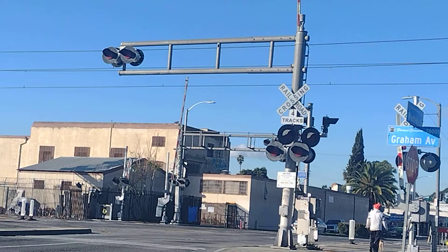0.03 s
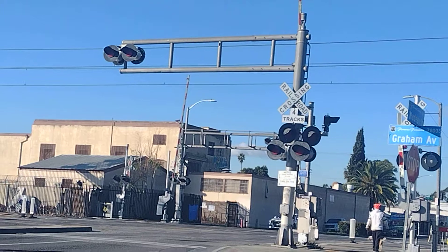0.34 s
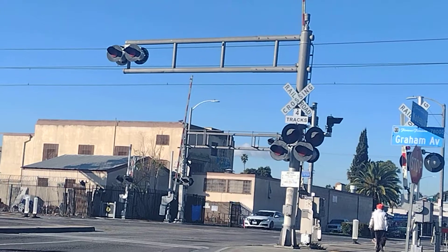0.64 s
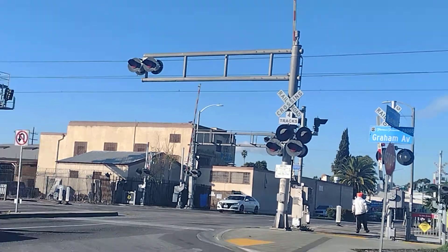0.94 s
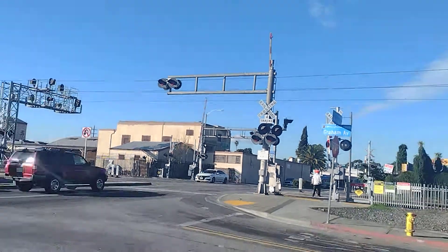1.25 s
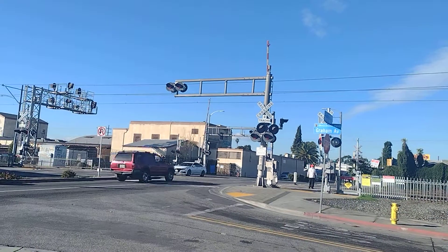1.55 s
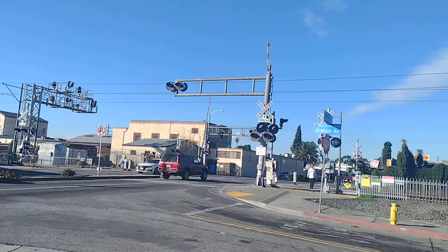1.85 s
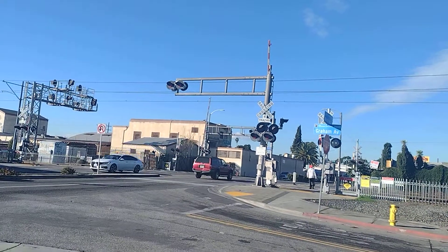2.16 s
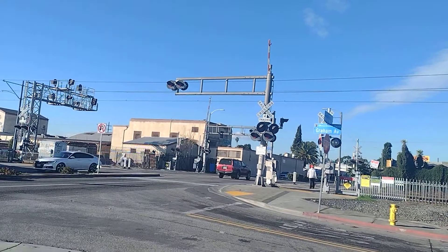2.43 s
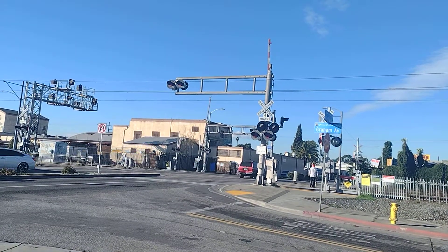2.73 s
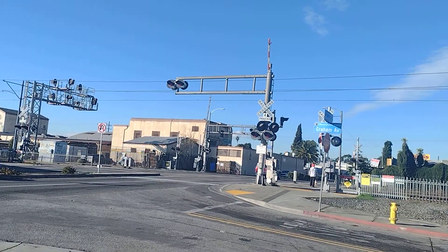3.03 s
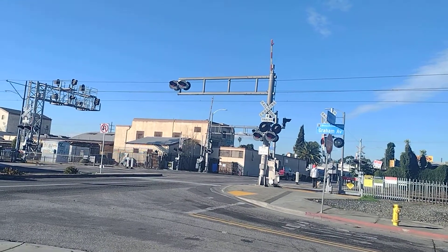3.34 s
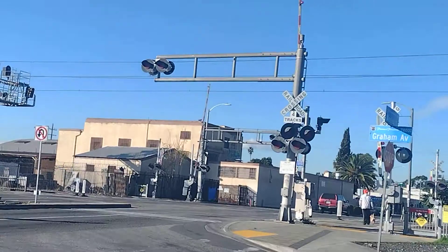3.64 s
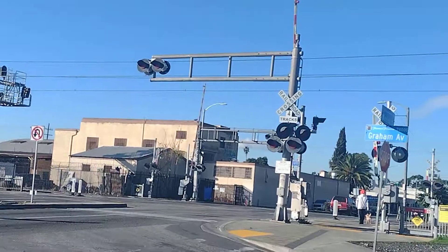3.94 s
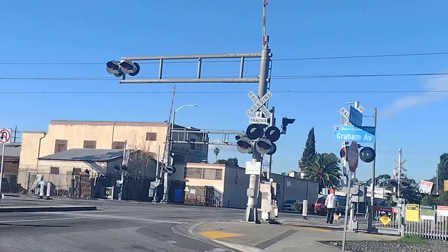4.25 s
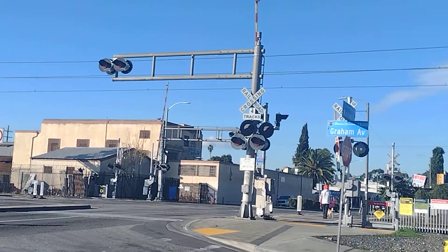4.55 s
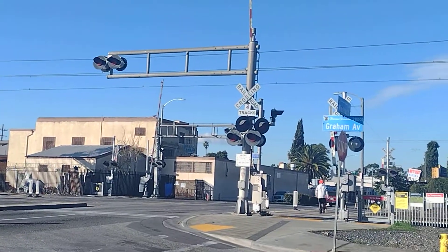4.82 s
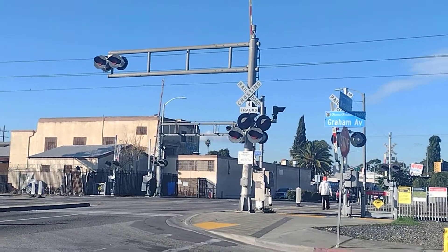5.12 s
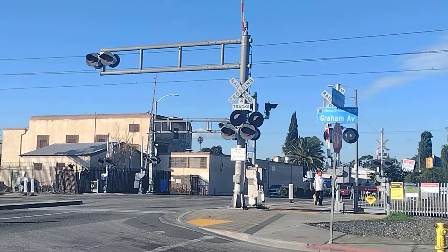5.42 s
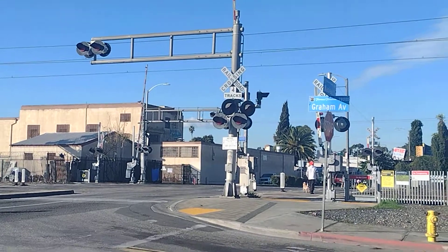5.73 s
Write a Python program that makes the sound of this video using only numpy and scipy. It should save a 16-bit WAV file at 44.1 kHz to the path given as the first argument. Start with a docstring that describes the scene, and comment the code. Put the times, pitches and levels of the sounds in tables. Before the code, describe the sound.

After a brief silence, outdoor street sound fades in at about 0.4 seconds, heard from the kerb by a level crossing. An SUV rolls from the left towards the centre with a low rumble, tyre roar and light hiss. A saloon car follows, loudest around 2.3 seconds. From 1.3 to about 2.9 seconds their wheels clack and thump over the rails in a quick, uneven run, with two faint, sharp ticks just after 2 seconds and one last soft thump at 3.4. The saloon's low exhaust hum swells near 3 seconds and dies away, leaving a steady murmur of distant traffic. Loose metal clinks briefly around 4 seconds and more faintly at 4.8. A finger lightly brushes the microphone on the left at 5 seconds, and a small tick follows at 5.5. A quieter third car nears from the left with a hollow tyre drone until 6 seconds.

```python
"""Cars on a level crossing

Heard from the kerb, an SUV and then a saloon roll by with a rumble, a tyre roar and a hiss. Their
wheels clack on the rails, the air in the tyres thumps, and the saloon's exhaust hums. A third car nears.
Town traffic murmurs, loose metal clinks, sharp ticks sound close by, and a finger brushes the camera."""
import sys
import numpy as np
from scipy import signal
from scipy.fft import rfft, irfft
from scipy.io import wavfile
from scipy.ndimage import uniform_filter1d

SR = 44100
rng = np.random.default_rng(int(sys.argv[2]) if len(sys.argv) > 2 else 0)


def int16_out(signal):
    """Quantize to a 16-bit WAV file."""
    q = np.round(np.clip(np.atleast_2d(signal).T, -1, 1) * 32767)
    wavfile.write(sys.argv[1], SR, q.astype(np.int16))


N = 263718
TIME = np.arange(N) / SR

# where each car is: t/s, direction (sine of the angle: -1 is left, +1 is right)
SALOON_PATH = [(1.7, -0.51), (2.3, -0.066), (2.801, -0.39), (3.399, -0.39), (4.3, -0.38)]
THIRD_PATH = [(5, -0.91), (6, -0.98)]
# the saloon's tone colour, one list each for rumble, roar and hiss: f/Hz, level/dB
SALOON_COLOURS = [
    [(35, -43), (62, -29), (100, 4), (165, -3.5), (226, 3.5), (320, -1), (470, -16.5), (900, -68)],
    [(450, -29), (660, -2), (1000, 4), (1300, -5), (1600, -3.5), (2300, -12), (2900, -19.5), (3500, -34.5),
     (5500, -65)],
    [(2000, -39), (3400, 1.5), (4100, 4), (5800, -4), (7000, -6.5), (8800, -10), (10700, -23), (15500, -31)],
]
# an axle meets a rail: t/s, clack level/dB, thump level/dB, thump f/Hz, head start of one wheel/s
AXLE_HITS = [(1.2545, -17, -20, 92, 0), (1.336, -14, -18, 328, .0115), (1.514, -9.5, -17, 208, .012),
             (1.595, -10, -14.5, 229, .0115), (1.638, -13, -23.5, 216, 0.013),
             (1.6749, -14.5, -19.5, 217, 0), (1.756, -9, -33, 218, 0.0012), (1.794, -16.5, -35, 222, .007),
             (1.941, -25, -13.5, 221, 0), (2.0163, -15.5, -15.5, 212, 0),
             (2.1274, -13, -16.5, 243, 0.00061), (2.175, -11.5, -13.5, 188, 0),
             (2.2443, -21.5, -13.5, 220, 0), (2.2845, -13.5, -12, 221, .008),
             (2.32, -28, -16.5, 229, 0.0087), (2.4, -15, -19, 239, 0.0035), (2.722, -23, -26, 238, .009),
             (2.92, -33.5, -18.5, 233, 0.0065), (3.3931, -35, -24.5, 315, 0)]


def gain_of(db):
    """Turns decibels into a number to multiply a sound by."""
    return 10 ** (np.asarray(db) / 20)


def evened(x):
    """Scales a signal to an average strength (rms) of 1."""
    return x / np.sqrt(np.mean(x ** 2) + 1e-20)


def at_pitch(table, hz):
    """Looks up a table by frequency, giving each octave equal room."""
    f, value = np.transpose(table)
    return np.interp(np.log(hz + 1), np.log(f + 1), value)


def at_time(table, t):
    """Looks up a table by time, drawing straight lines between its rows."""
    return np.interp(t, *np.transpose(table))


def add(mix, start_s, sound):
    """Adds a sound to both channels of the mix."""
    part = mix[:, round(start_s * SR):][:, :sound.shape[-1]]
    part += sound[..., :part.shape[1]]


def coloured(x, colour):
    """Turns each frequency up or down by a table of f/Hz, level/dB."""
    size = x.shape[-1]
    return irfft(rfft(x) * gain_of(at_pitch(colour, np.fft.rfftfreq(size, 1 / SR))), size)


def wobble(top_hz, order):
    """A random wavering, mostly slower than top_hz."""
    return evened(signal.sosfilt(signal.butter(order, top_hz, fs=SR, output="sos"), rng.normal(size=N)))


def swell(from_s, until_s, level_db, rise_db_per_s, fade_db_per_s):
    """A volume curve that rises, holds between the two times, then fades."""
    early, late = np.maximum(from_s - TIME, 0), np.maximum(TIME - until_s, 0)
    return gain_of(level_db - rise_db_per_s * early - fade_db_per_s * late)


def road_noise(colour, path, directness, flicker_db, mic_gap_s=0.00053):
    """Flickering noise at two microphones: part comes straight from the source, part from all round."""
    # how much sound comes straight, before directness scales it: f/Hz, weight
    straight_weights = [(100, 0.42), (500, 0.66), (1000, 0.71), (2000, 0.33), (3000, 0.13), (6000, 0.2),
                        (12000, 0.3)]
    t, hz = np.arange(N // 256 + 5) * 256 / SR, np.fft.rfftfreq(1024, 1 / SR)
    shape = (3, len(t), len(hz))
    direct, common, apart = rng.standard_normal(shape) + 1j * rng.standard_normal(shape)
    # straight sound reaches the nearer microphone first
    shift = np.exp(1j * np.pi * hz * mic_gap_s * at_time(path, t)[:, None])
    straight = np.array([direct / shift, direct * shift])
    # scattered sound is alike on both sides only in the bass
    alike = .98 * np.sinc(2 * hz * mic_gap_s)
    common, apart = common * np.sqrt((1 + alike) / 2), apart * np.sqrt((1 - alike) / 2)
    scattered = np.array([common + apart, common - apart])
    share = np.clip(directness * at_pitch(straight_weights, hz), 0, 1)
    spectrum = np.sqrt(share) * straight + np.sqrt(1 - share) * scattered
    flicker = uniform_filter1d(rng.standard_normal(shift.shape), size=10, axis=0)  # smooth in time
    flicker = evened(uniform_filter1d(flicker, size=9, axis=1))  # and in pitch
    rolloff_db = -60 * np.log2(np.maximum(hz / colour[-1][0], 1))  # above the table's last row
    spectrum *= gain_of(at_pitch(colour, hz) + rolloff_db + flicker_db * flicker)
    noise = signal.istft(spectrum.transpose(0, 2, 1), nperseg=1024, noverlap=768)[1][:, :N]
    return noise / noise.mean(0).std()


def bursts(hits, colour, t60_s, spread, snap=5):
    """Sharp bursts (t/s, level/dB) whose noise falls 60 dB in t60_s; spread sets the stereo width."""
    out, t = np.zeros((2, N)), np.arange(-256, 7936) / SR
    for start_s, db in hits:
        burst = rng.standard_normal((2, len(t))) * (t >= 0) * gain_of(-60 * abs(t) / t60_s)
        burst[0, np.searchsorted(t, .001)] += snap  # a click just after the start
        mid, side = coloured(burst, colour)
        stereo = np.array([mid + spread * side, mid - spread * side])
        add(out, start_s + t[0], gain_of(db) * stereo / abs(mid).max())
    return out


def microphone_hiss(level_db=-84):
    """The faint, even hiss that microphones make by themselves."""
    return gain_of(level_db) * rng.standard_normal((2, N))


def town(engines_db=-39, wash_db=-43.5):
    """Far traffic: a steady low murmur of engines and a soft wash of noise."""
    # tone colour, one list for the engines and one for the wash: f/Hz, level/dB
    colours = [
        [(30, -29.5), (55, -21.5), (85, 0.5), (175, -2.5), (250, -2.5), (330, -5.5), (550, -14.5), (900, -66.5)],
        [(400, -11), (620, -0.5), (850, 4), (1200, -3), (2150, -12), (3250, -29.5), (4800, -43), (6300, -43),
         (8500, -58), (15500, -65.5)],
    ]
    engines = road_noise(colours[0], THIRD_PATH, directness=0.34, flicker_db=1.0)
    wash = road_noise(colours[1], THIRD_PATH, directness=0.89, flicker_db=1.75)
    return engines * gain_of(engines_db) + wash * gain_of(wash_db)


def street_echoes(sound, level_db=-10):
    """Walls and posts throw back scattered echoes; the treble dies first."""
    # how long echoes last: f/Hz, time to fall by 60 decibels/s
    decay_times = [(100, 0.17), (1000, 0.14), (4000, 0.16), (12000, 0.077)]
    echoes = rng.standard_normal((2, SR // 2)) * (rng.random((2, SR // 2)) < .05)
    echoes[:, :200] = 0  # the gap before the first echo
    hz, t, spectrum = signal.stft(echoes, SR, nperseg=256)
    decay = gain_of(-60 * t / at_pitch(decay_times, hz)[:, None])
    tail = signal.istft(spectrum * decay, SR, nperseg=256)[1]
    return gain_of(level_db) * signal.fftconvolve(sound, tail / np.linalg.norm(tail[0]), axes=1)[:, :N]


def finger_brush(right_db=-13):
    """Skin slides over the camera beside the left microphone."""
    # tone colour of sliding skin: f/Hz, level/dB
    colour = [(1500, -20), (3000, 11), (3800, -14), (4600, 1), (5400, -17), (6300, 4), (7000, 1),
              (8200, -12), (10500, -23), (15000, -27)]
    brush = evened(coloured(rng.standard_normal((2, N)), colour))
    brush *= swell(5.005, 5.052, level_db=-55.5, rise_db_per_s=410, fade_db_per_s=330)
    return brush * gain_of([[0], [right_db]])


def ticks():
    """Sharp, high ticks close by, two of them as the wheels clack on the rails."""
    # a tick's tone colour: f/Hz, level/dB
    colour = [(1000, -20.5), (3000, -10.5), (6500, 5), (9000, -3), (11000, -16), (15000, -17)]
    # each tick: t/s, level/dB
    moments = [(2.023, -46), (2.1744, -51), (5.4655, -53)]
    return bursts(moments, colour, t60_s=.018, spread=.3)


def rattles():
    """Loose metal clinks down the road, ringing in a few broad bands of pitch."""
    # where the metal rings: f/Hz, width/Hz, level/dB
    bands = [(2110, 200, 29.5), (3140, 760, 3), (4730, 480, 3), (6400, 740, -13)]
    # each clink: t/s, level/dB
    clinks = [(3.8955, -42), (4.0557, -35.5), (4.0774, -47), (4.8135, -53)]
    hz = np.geomspace(500, 15000, 120)
    ringing = sum(gain_of(db) / (1 + (2 * (hz - f) / width) ** 2) for f, width, db in bands)
    colour = np.column_stack([hz, 20 * np.log10(ringing)])
    return bursts(clinks, colour, t60_s=.15, spread=0.33)


def tyre_drone():
    """Tyres still far up the road throw a hollow note ahead of them."""
    # the note's tone colour: f/Hz, level/dB
    colour = [(280, -24.5), (400, -4), (510, 7.5), (620, -11.5), (850, -28.5)]
    # each drone: full from t/s, until t/s, level/dB, rise/(dB/s), fade/(dB/s)
    swells = [(0.414, 0.517, -37, 20, 25.5), (5.883, 5.98, -36, 44, 28)]
    volume = sum(swell(*row) for row in swells)
    return road_noise(colour, THIRD_PATH, directness=1.33, flicker_db=0.8) * volume


def rolling_car(swells, path, colours, directness, grit_db):
    """Body rumble, tyre roar and tread hiss grow as a car nears and fade as it leaves."""
    rumble, roar, hiss = (road_noise(colour, path, directness, flicker_db=1.4) * swell(*row)
                          for row, colour in zip(swells, colours))
    grit = gain_of(grit_db * wobble(top_hz=110, order=3))  # coarse asphalt shakes the tread
    return rumble + (roar + hiss) * grit


def third_car():
    """A quieter car rolls closer on the left at the end."""
    # rumble, roar and hiss: full from t/s, until t/s, level/dB, rise/(dB/s), fade/(dB/s)
    swells = [(5.6, 5.7, -50, 33, 35), (5.78, 5.98, -40.5, 28, 15), (5.9, 5.98, -69.5, 30, 10)]
    # their tone colours: f/Hz, level/dB
    colours = [
        [(30, -38), (80, -2), (170, -7), (450, 13), (900, -53)],
        [(450, -13), (700, 3), (1100, -16), (1350, -7), (1750, -7.5), (2300, -19.5), (3500, -32.5), (5500, -78)],
        [(2000, -28), (3500, 6), (5200, -1), (6200, 3), (7700, -3), (9500, -32), (15500, -52)],
    ]
    return rolling_car(swells, THIRD_PATH, colours, directness=1.43, grit_db=-1.5)


def suv():
    """The first car rolls by from left to right."""
    # rumble, roar and hiss: full from t/s, until t/s, level/dB, rise/(dB/s), fade/(dB/s)
    swells = [(.58, 1.93, -28.5, 50, 33), (1.36, 1.87, -28.5, 3.5, 33.5), (0.38, 1.05, -58, 8, 10.5)]
    # their tone colours: f/Hz, level/dB
    colours = [
        [(30, -41.5), (75, -14.5), (135, 2), (175, -7.5), (225, -2), (340, -2.5), (470, -8), (570, -24.5),
         (900, -75)],
        [(450, -23), (650, 4), (950, 8), (1400, -4), (2150, -3.5), (2700, -13), (3400, -23.5), (5500, -59)],
        [(2000, -32.5), (3400, 0.5), (4100, 3), (6300, -3), (9000, -15.5), (10700, -24), (13200, -22),
         (15500, -23)],
    ]
    # where the car is: t/s, direction (-1 is left, +1 is right)
    path = [(.4, -0.94), (.9, -0.55), (1.4, -0.41), (1.55, 0.17), (2.6, 0.067), (3.6, 0.34)]
    return rolling_car(swells, path, colours, directness=0.85, grit_db=1.24)


def saloon():
    """The second car rolls by just after the first."""
    # rumble, roar and hiss: full from t/s, until t/s, level/dB, rise/(dB/s), fade/(dB/s)
    swells = [(2.22, 2.357, -24, 20.5, 87), (2.254, 2.357, -27.5, 22.4, 15.3), (2.2, 2.46, -66, 39, 6.1)]
    return rolling_car(swells, SALOON_PATH, SALOON_COLOURS, directness=0.92, grit_db=1.9)


def exhaust(waver=0.0363, rough_db=3, overtone_db=-7):
    """The saloon turns its tail to the kerb: uneven engine pulses hum over a boom of gas."""
    # how often the engine fires, slowing as the driver eases off: t/s, f/Hz
    firing = [(2.2, 117.1), (2.7, 109.9), (4.4, 109.7)]
    firing_hz = at_time(firing, TIME) * (1 + waver * wobble(top_hz=18, order=2))
    cycles = np.cumsum(firing_hz) / SR
    hum = evened(sum(gain_of(overtone_db * k) * np.sin(2 * np.pi * (k + 1) * cycles) for k in range(3)))
    hum *= gain_of(rough_db * wobble(top_hz=18, order=2))
    hum *= swell(3, 3, level_db=-34, rise_db_per_s=11, fade_db_per_s=29)
    boom = road_noise(SALOON_COLOURS[0], SALOON_PATH, directness=0.88, flicker_db=0.6)
    boom *= swell(2.5, 3, level_db=-31.5, rise_db_per_s=45, fade_db_per_s=13)
    return hum + boom


def tyre_thumps(t60_s=0.082, rise_s=0.0031, lag_s=.006, panel_hz=315, panel_db=-8):
    """Hitting a rail briefly rings the air inside the tyre and the crossing panel under it."""
    out, t = np.zeros((2, N)), np.arange(SR // 4) / SR
    volume = (1 - np.exp(-t / rise_s)) * gain_of(-60 * t / t60_s)
    for hit_s, _, db, tyre_hz, _ in AXLE_HITS:
        tyre, panel = np.sin(2 * np.pi * (np.outer([tyre_hz, panel_hz], t) + rng.random((2, 1))))
        ring = (tyre + gain_of(panel_db) * panel) * volume
        add(out, hit_s + lag_s, gain_of(db) * ring / abs(ring).max())
    return out


def wheel_clacks(early_wheel_db=-4, joint_count=10):
    """Wheels strike the rails, and joints between the crossing panels add light knocks at random."""
    # a clack's tone colour: f/Hz, level/dB
    colour = [(60, -46), (200, 4.5), (550, -1.5), (900, 5), (1300, 2.5), (1900, 7), (2700, -2), (3300, -14),
              (4500, -28), (7000, -46.5), (11000, -59.5)]
    main = [(hit_s, db) for hit_s, db, *_ in AXLE_HITS]
    # an axle that crosses at a slant lands one wheel early, and more lightly
    early = [(hit_s - lead_s, db + early_wheel_db) for hit_s, db, _, _, lead_s in AXLE_HITS if lead_s > 0]
    joint_s = rng.uniform(1.2, 2.8, joint_count)
    joint_db = rng.normal(-29.5, 2.2, joint_count)
    return bursts([*main, *early, *zip(joint_s, joint_db)], colour, t60_s=0.031, spread=.25, snap=8.5)


def scene():
    """Three cars, their blows on the rails and the town behind; only clacks and rattles echo."""
    cars = suv() + saloon() + third_car()
    knocks = wheel_clacks() + rattles()
    street = cars + exhaust() + tyre_drone() + town() + knocks + street_echoes(knocks) + tyre_thumps()
    return street + finger_brush() + ticks() + microphone_hiss()


def record(dry, start_s=.366, fade_in_s=0.22, opening_db=-9, bass_cut_hz=54, treble_cut_hz=15730):
    """After a silence the sound fades in; each microphone colours it and loses deep bass and top treble."""
    # how the two microphone openings differ: f/Hz, left minus right level/dB
    mic_balance = [(100, 0.1), (700, -0.65), (1400, 0.8), (2400, 3.5), (2900, 2), (3400, -5), (4300, 1.5),
                   (6200, 2), (7400, -7), (9500, -1.5), (13000, -2.5)]
    fade_in = np.interp(TIME - start_s, [0, .004, fade_in_s], [0, gain_of(opening_db), 1])
    left, right = np.pad(dry * fade_in, ((0, 0), (0, SR // 10)), "reflect", reflect_type="odd")
    left = coloured(left, [(hz, db / 2) for hz, db in mic_balance])
    right = coloured(right, [(hz, -db / 2) for hz, db in mic_balance])
    bass_cut = signal.butter(3, bass_cut_hz, "highpass", fs=SR, output="sos")
    treble_cut = signal.firwin(701, treble_cut_hz, window=("kaiser", 9), fs=SR)
    stereo = signal.sosfilt(bass_cut, [left, right])
    stereo = signal.oaconvolve(stereo, treble_cut[None], "same")[:, :N]
    fade_out = np.minimum((TIME[-1] - TIME) / .002, 1)
    return stereo * (TIME > start_s) * fade_out


dry = scene()
out = record(dry)
int16_out(out)
```